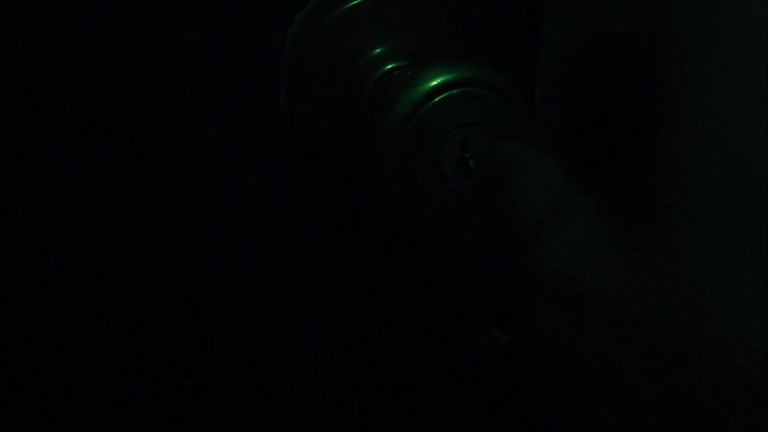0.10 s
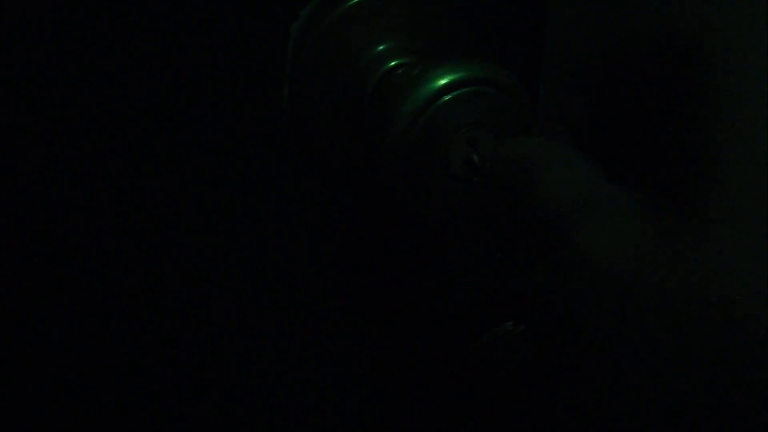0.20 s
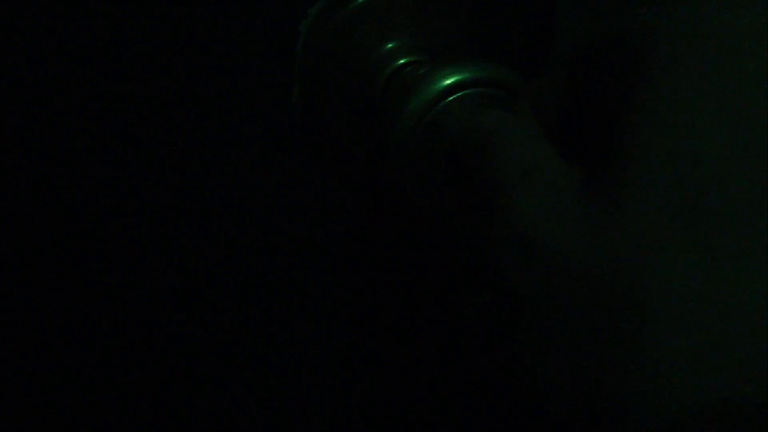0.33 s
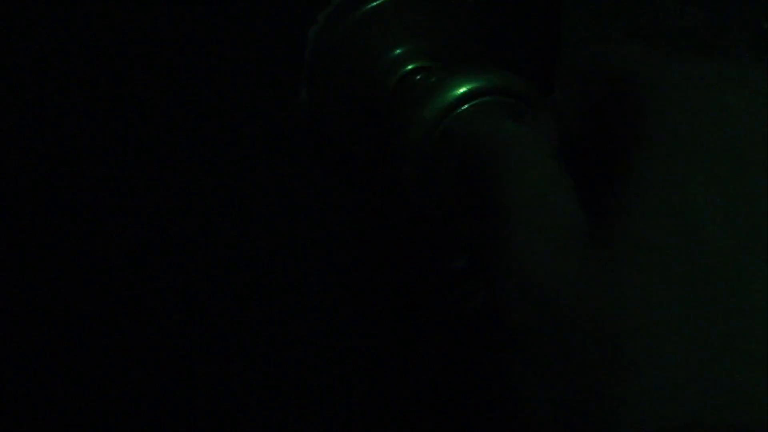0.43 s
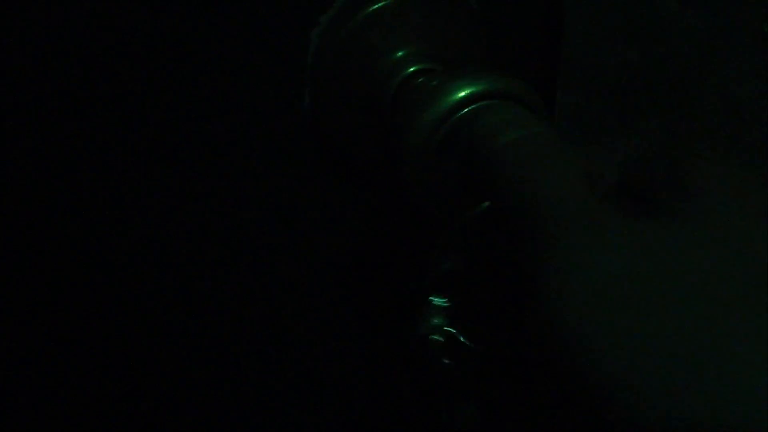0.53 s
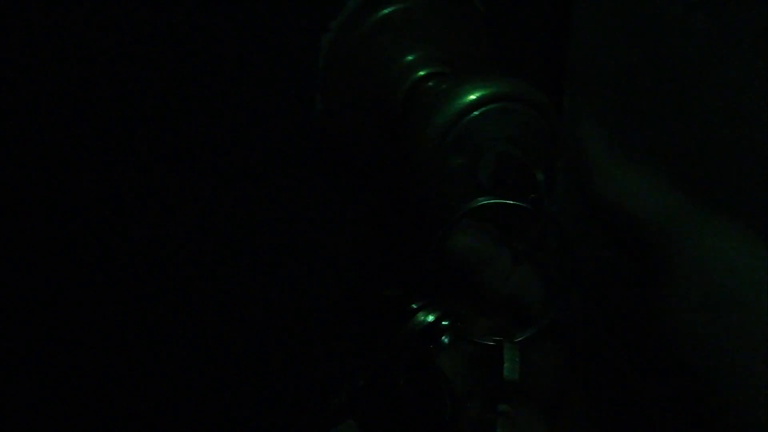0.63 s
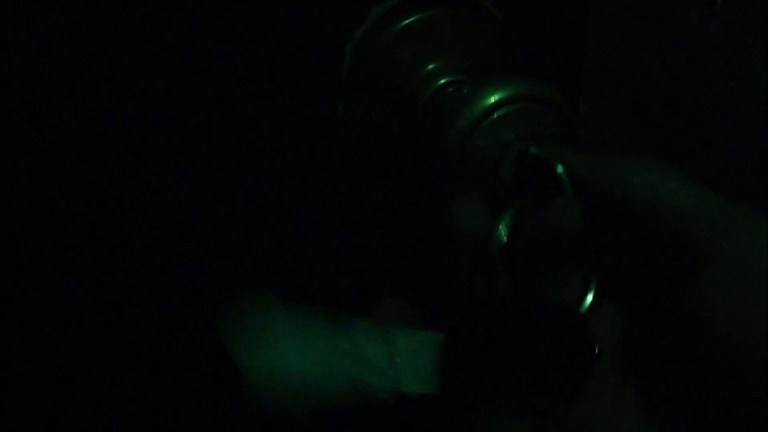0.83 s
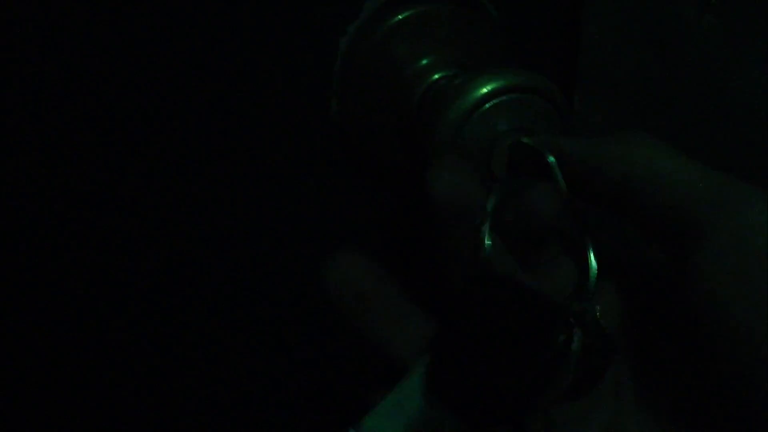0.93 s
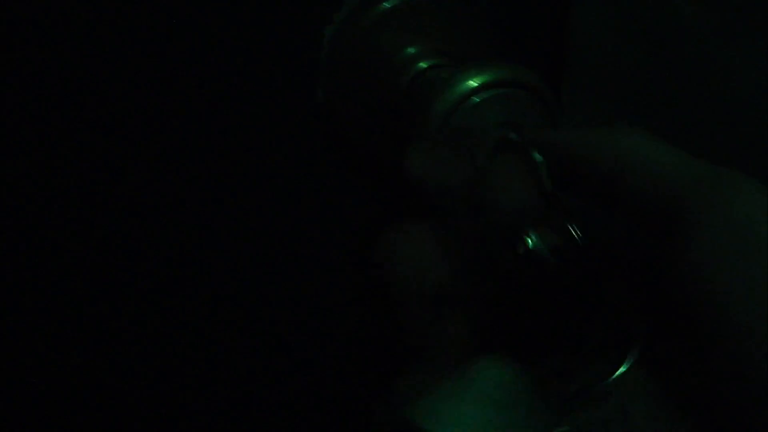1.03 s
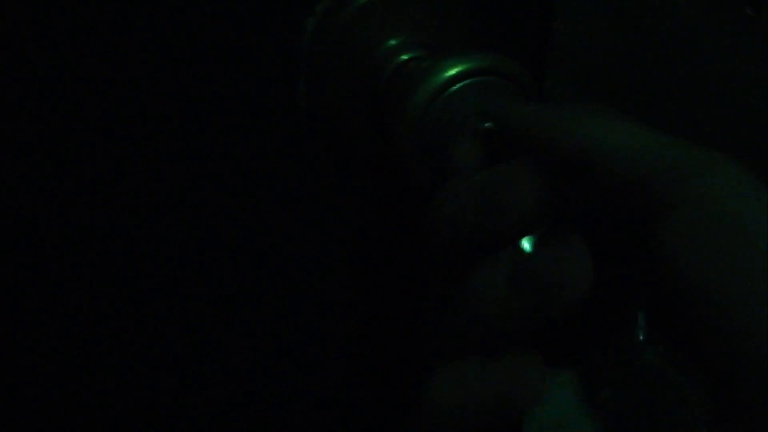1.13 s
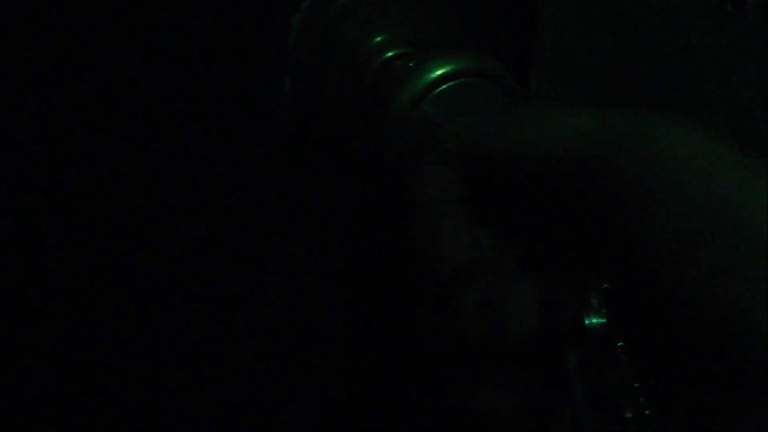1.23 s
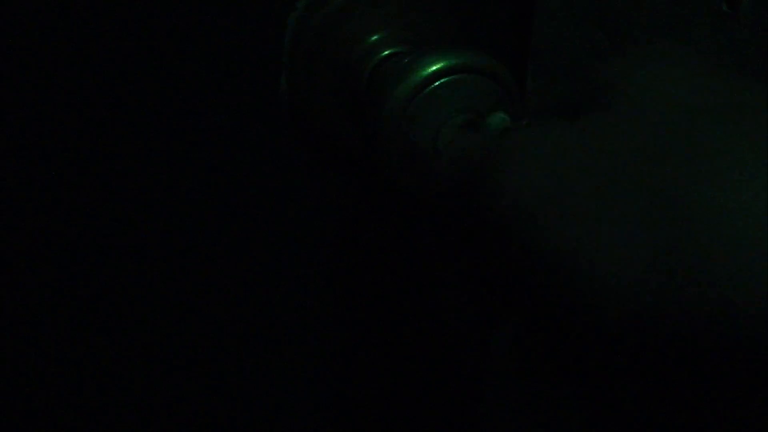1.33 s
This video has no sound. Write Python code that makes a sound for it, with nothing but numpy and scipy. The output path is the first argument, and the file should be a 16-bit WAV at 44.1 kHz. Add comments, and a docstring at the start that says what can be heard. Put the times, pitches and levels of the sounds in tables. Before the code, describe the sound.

Key worked in a door lock up close: grinding, hollow door knocks, then irregular metallic jangling

```python
"""On a porch at night a key is worked in a door lock, close to the microphone.
The lock grinds and scrapes as grains of friction and knocks in the booming door, built from damped modes.
The bunch swings, jangles and clicks as noise cracks and damped sines, and the hand takes hold of the key
again; a thin squeak is a wavering sine. Near walls answer briefly over a faint outdoor rush of noise."""
import sys
import numpy as np
from scipy import signal
from scipy.fft import rfft, irfft
from scipy.io import wavfile
from scipy.ndimage import uniform_filter1d

SR = 44100
rng = np.random.default_rng(int(sys.argv[2]) if len(sys.argv) > 2 else 0)


def dump(signal):
    """Clip the signal to [-1, 1] and save it as 16-bit WAV at the path in sys.argv[1]."""
    limited = np.clip(np.atleast_2d(signal).T, -1, 1)
    pcm = np.round(limited * 32767).astype(np.int16)
    wavfile.write(sys.argv[1], SR, pcm)


N = 61740
TIME = np.arange(N) / SR
HALF_SECOND = TIME[:SR // 2]
SIZE = 2 * 65536  # transform length, samples
HZ = np.fft.rfftfreq(SIZE, 1 / SR)

# Rubbing of key and lock. Each row: time in seconds, low grinding in relative dB, bright scraping in dB.
RUBBING = [(0, -49.5, -62), (.17, -47, -65), (.222, -38.5, -71), (.23, -21, -36), (.28, -26, -31),
           (.32, -27, -25), (.385, -32, -31), (.415, -50, -47), (.47, -43, -56), (.545, -37, -37.5),
           (.6, -41, -47.5), (.668, -41.5, -34), (.71, -49.5, -51.5), (.775, -39.5, -36.5),
           (.825, -44, -38), (.865, -44, -24.5), (.93, -38.5, -40.5), (.975, -44, -34.5), (1.0, -45, -48),
           (1.08, -49.5, -56), (1.1, -54, -38.5), (1.2, -39.5, -41.5), (1.27, -41.5, -46),
           (1.335, -38.5, -56), (1.36, -36, -48), (1.4, -38, -45)]


def amp(db):
    """Decibels to gain."""
    return 10 ** (np.asarray(db) / 20)


def unit(x):
    """Scale to rms 1."""
    return x / np.sqrt(np.mean(x ** 2) + 1e-20)


def along(points, hz):
    """Read (Hz, value) points on a log frequency axis."""
    point_hz, values = np.transpose(points)
    return np.interp(np.log(hz + 1), np.log(point_hz + 1), values)


def curves(rows):
    """Draw each column after the time as straight lines, one value per sample."""
    seconds, *columns = np.transpose(rows)
    return [np.interp(TIME, seconds, column) for column in columns]


def fade(t, t60):
    """Exponential decay, down 60 dB after t60 seconds."""
    return np.exp(-np.log(1000) * t / t60)


def filtered(x, response):
    """Filter x by a response on the frequency grid."""
    return irfft(rfft(x, SIZE) * response, SIZE)[..., :x.shape[-1]]


def spread(pair):
    """Turn two unrelated signals into left and right, alike in the bass and wider in the treble."""
    # Likeness of the two channels. Each row: frequency in Hz, correlation from 0 to 1.
    likeness = [(30, .5), (130, .99), (350, .97), (700, .82), (1500, .55), (5000, .5), (13000, .45)]
    turn = np.arccos(np.clip(along(likeness, HZ), 0, 1)) / 2
    mid, side = filtered(pair, np.array([np.cos(turn), np.sin(turn)]))
    return np.array([mid + side, mid - side])


def noise(colour):
    """Coloured stereo noise of rms 1."""
    white = spread(rng.standard_normal((2, N)))
    return unit(filtered(white, amp(along(colour, HZ))))


def pan(x, db):
    """Raise the left and lower the right by db."""
    return x * amp([[db], [-db]])


def add(out, s, sound):
    """Mix a sound in at s seconds."""
    part = out[:, max(round(s * SR), 0):][:, :sound.shape[-1]]
    part += sound[..., :part.shape[1]]


def bursts(hits, colour, t60):
    """Each (seconds, dB) contact gives a crack: coloured noise that rises fast and dies in t60 seconds."""
    out = np.zeros((2, N))
    stock = noise(colour)
    t = TIME[:SR // 20]
    shape = fade(t, t60) * (1 - fade(t, t60 / 10))
    starts = rng.integers(0, N - len(shape), len(hits))
    for (s, db), start in zip(hits, starts):
        crack = stock[:, start:start + len(shape)] * shape
        even_energy = np.linalg.norm(shape) * 2 / np.linalg.norm(crack)
        add(out, s, amp(db) * crack * even_energy)
    return out


def pulse(colour):
    """One causal push of the given colour, peak 1, made minimum-phase by folding its cepstrum."""
    cepstrum = irfft(np.log(amp(along(colour, HZ))))
    cepstrum[1:SIZE // 2] *= 2
    cepstrum[SIZE // 2 + 1:] = 0
    push = irfft(np.exp(rfft(cepstrum)))[:SR // 2]
    return push / np.abs(push).max()


def friction(colour, level_db):
    """Tiny slips of random size and timing, coloured, under the level of the stroke."""
    slips_per_s, size_spread_db = 2200, 2
    sizes = amp(size_spread_db * np.clip(rng.standard_normal(N), -2, 2))
    slips = (rng.random(N) < slips_per_s / SR) * sizes
    grains = spread(slips * rng.standard_normal((2, N)))
    return amp(level_db) * unit(filtered(grains, amp(along(colour, HZ))))


def night_air():
    """The faint outdoor rush: steady coloured noise."""
    # Spectrum of the night air. Each row: frequency in Hz, relative level in dB.
    night_colour = [(25, -35), (80, -15), (150, -9.5), (210, 2), (300, -3), (400, -3.5), (460, 3),
                    (620, -6), (1050, -5.5), (2000, -11), (5000, -21), (9000, -28.5), (10200, -28),
                    (13000, -57)]
    level_db = -49.5
    return amp(level_db) * noise(night_colour)


def porch(x):
    """A few near reflections and a short diffuse tail; little bass comes back in the open."""
    # Decay of the tail. Each row: frequency in Hz, t60 in seconds.
    decay = [(200, 0.57), (1500, 0.52), (5000, 0.09), (12000, 0.23)]
    # Near walls. Each row: nominal delay in seconds, reflection in dB before the bass is thinned.
    near_walls = [(.0032, -10.5), (.0062, -10), (.0098, -11.5)]
    tail_db, rise_s, low_hz = -8.5, 0.0013, 407
    hz, t, z = signal.stft(rng.standard_normal((2, SR // 2)), SR, nperseg=256)
    tail = signal.istft(z * fade(t, along(decay, hz)[:, None]), SR, nperseg=256)[1]
    tail = tail * (1 - np.exp(-TIME[:tail.shape[1]] / rise_s))
    response = amp(tail_db) * rfft(tail / np.linalg.norm(tail[0]), SIZE)
    for s, db in near_walls:
        delay = s * rng.uniform(.9, 1.1, (2, 1))  # differs a little between the channels
        response = response + amp(db) * np.exp(-2j * np.pi * HZ * delay)
    bass_loss = HZ ** 2 / (HZ ** 2 + low_hz ** 2)
    return filtered(x, response * bass_loss)


def squeak():
    """The key squeaks as it turns: a thin, unsteady, mostly falling note of metal on metal."""
    # Path of the squeak. Each row: time in seconds, pitch in Hz, sine peak in dB.
    squeak_path = [(1.255, 4450, -70), (1.272, 4390, -47), (1.295, 4410, -49), (1.308, 4310, -42),
                   (1.335, 4165, -53), (1.37, 4060, -52), (1.39, 4150, -80)]
    waver_hz = 61.4  # rms
    hz, db = curves(squeak_path)
    waver = unit(uniform_filter1d(rng.standard_normal(N), size=60))
    phase = 2 * np.pi * np.cumsum(hz + waver_hz * waver) / SR
    return amp(db) * np.sin(phase)


def door_panel():
    """The door panel's answer to a blow: a sum of damped sines."""
    # Panel modes. Each row: frequency in Hz, relative level in dB, t60 in seconds.
    panel_modes = [(192.9, 2.5, 0.23), (214.3, 2.5, .38), (234, -11.5, 0.3), (295, 1, 0.17),
                   (357.2, -6, 0.24), (386.8, 1.5, 0.22), (474, 0, .28), (547, -8, 0.22), (721, -16, 0.45),
                   (764, -8, 0.23), (820, -25, 0.2), (895, -4, 0.15), (1130, -0.5, 0.065),
                   (1476, -19, 0.36)]
    t = HALF_SECOND
    return sum(amp(db) * fade(t, t60) * np.sin(2 * np.pi * hz * t) for hz, db, t60 in panel_modes)


def grinding(panel):
    """Low friction in the lock, which also drives the modes of the door panel."""
    # Spectrum of the grinding. Each row: frequency in Hz, relative level in dB.
    grind_colour = [(25, -43), (90, -35), (140, -3.5), (200, -3.5), (450, 0), (1100, 0), (2300, -7.5),
                    (4500, -20.5), (12000, -37)]
    panel_db = -5.5  # panel against direct grinding
    grind = friction(grind_colour, curves(RUBBING)[0])
    boom = unit(filtered(grind.mean(axis=0), rfft(panel, SIZE))) * np.std(grind)
    return grind + amp(panel_db) * boom


def knocks():
    """The lock knocks in the door: each blow is a hollow rap of noise and a dull thud of one push."""
    # Knocks. Each row: start in seconds, relative rap level in dB, thud against rap in relative dB.
    knock_times = [(.187, -31.5, -13), (0.209, -36, 3), (0.2273, -19.5, 6), (0.2424, -18, -5.5),
                   (0.2466, -22.5, 2), (0.2538, -21.5, 4), (0.265, -20.5, -9), (0.2764, -21.5, 0),
                   (.295, -16, 7.5), (.3065, -16, 8.5), (0.319, -19.5, 5.5), (0.3275, -25, 6),
                   (.335, -25, -2), (0.356, -29, 22), (.555, -37, -1), (.668, -28, -4), (0.86, -33, -10),
                   (.9393, -32, -19), (0.9648, -31.5, -3), (1.058, -27.5, -23), (1.066, -37.5, -12),
                   (1.0755, -32.5, -14), (1.191, -31, -15), (1.287, -29.5, -11), (1.344, -28.5, 2),
                   (1.356, -33.5, -11), (1.367, -34, -2)]
    # Spectrum of the rap. Each row: frequency in Hz, relative level in dB.
    rap_colour = [(60, -47), (280, -14), (470, 3.5), (780, 5.5), (1200, -1.5), (2300, -5), (5000, -56),
                  (12000, -60)]
    # Spectrum of the thud. Each row: frequency in Hz, relative level in dB.
    thud_colour = [(30, -48), (100, -19.5), (150, -8), (200, 1), (300, 1.5), (500, -7.5), (1000, -22.5),
                   (4000, -37.5)]
    rap_t60, thud_gain_db = 0.034, 1.5  # seconds, dB on every thud
    out = bursts([(s, db) for s, db, _ in knock_times], rap_colour, rap_t60)
    thud = amp(thud_gain_db) * pulse(thud_colour)
    for s, db, thud_db in knock_times:
        add(out, s, amp(db + thud_db) * thud)
    return out


def booms(panel):
    """Heavy knocks set the whole door booming: the panel modes with a soft rise."""
    # Booms of the door. Each row: start in seconds, relative level in dB.
    boom_times = [(0.2274, -29), (0.3064, -22.5), (.555, -44.5), (1.125, -53.5), (1.344, -40.5)]
    rise_s = 0.024  # seconds to 99.9 % of full strength
    out = np.zeros((2, N))
    for s, db in boom_times:
        add(out, s, amp(db) * panel * (1 - fade(HALF_SECOND, rise_s)))
    return out


def scraping():
    """Bright friction of the key against the metal of the lock."""
    # Spectrum of the scraping. Each row: frequency in Hz, relative level in dB.
    scrape_colour = [(300, -31), (1500, -10.5), (2500, -4.5), (4200, 1), (5500, -2), (7500, 1), (9000, 0),
                     (10100, 4.5), (11700, 0), (13000, -8)]
    return friction(scrape_colour, curves(RUBBING)[1])


def lock():
    """The key scrapes; grinding and knocks pass into the door, and heavy knocks set it booming."""
    low_hz, struck_db, pan_db = 133, -3.5, 1  # high-pass, gain of grinding and knocks, left up
    panel = door_panel()
    struck = grinding(panel) + knocks()
    bass_cut = signal.butter(3, low_hz, "highpass", fs=SR, output="sos")
    door = amp(struck_db) * signal.sosfilt(bass_cut, struck) + booms(panel)
    return pan(door, pan_db) + scraping()


def ring(modes):
    """Damped sines, with new strengths and phases for each blow and each channel."""
    scatter_db = 0.5
    t = HALF_SECOND
    out = np.zeros((2, len(t)))
    for hz, db, t60 in modes:
        strength = amp(db + scatter_db * rng.standard_normal((2, 1)))
        phase = rng.uniform(-np.pi / 2, np.pi / 2, (2, 1))
        out += strength * fade(t, t60) * np.sin(2 * np.pi * hz * t + phase)
    return out


def ringing_pieces():
    """Blows leave one piece ringing freely until a neighbour touches it and damps it fast."""
    # Modes under the name of each piece. Each row: frequency in Hz, relative level in dB, t60 in seconds.
    pieces = {"long key": [(2123, -13, 0.28), (6160, 1.5, 0.069), (6930, 2, 0.12), (9986, -14, .1),
              (11350, 3, 0.34)], "short key": [(6880, 5.5, 0.053), (7820, -3, 0.168), (9240, -7, 0.2),
              (11670, -8, 0.24)], "small key": [(10050, -3, 0.134), (11680, -2.5, 0.27)],
              "flat key": [(10030, -2.5, 0.11), (10170, -5, 0.053), (10780, 1.5, 0.021)],
              "key in lock": [(3200, -24, 0.034), (3980, -11, .02), (4110, 1.5, 0.028), (4190, 1.5, 0.029),
              (4370, -6, 0.018), (7000, -20, .06)]}
    # Blows. Each row: start in seconds, relative level in dB, free ringing in seconds, name of the piece.
    blows = [(0.0603, -31.5, 0.0022, "flat key"), (0.2279, -24.5, 0.034, "flat key"),
             (0.322, -19, .05, "flat key"), (0.357, -32, 0.045, "short key"),
             (.507, -39, 0.0069, "small key"), (0.5533, -28.5, 0.011, "flat key"),
             (0.668, -39, 0.023, "small key"), (0.683, -36, 0.018, "small key"),
             (.726, -34.5, 0.013, "small key"), (.771, -42, 0.011, "flat key"),
             (.803, -43, .008, "small key"), (0.8303, -27, 0.034, "long key"),
             (0.8642, -25, .016, "short key"), (0.9, -32.5, 0.013, "short key"),
             (0.939, -39, .01, "short key"), (0.9563, -26, 0.0089, "short key"),
             (0.966, -16, 0.0065, "key in lock"), (1.0405, -36, .008, "key in lock"),
             (1.1461, -28.5, 0.0054, "short key"), (1.1444, -26, .008, "key in lock")]
    stopped_t60 = 0.013  # seconds
    out = np.zeros((2, N))
    for s, db, free_s, piece in blows:
        stopping = fade(np.maximum(HALF_SECOND - free_s, 0), stopped_t60)
        add(out, s, amp(db) * ring(pieces[piece]) * stopping)
    return out


def contacts():
    """Metal touches metal: a middling clack and a bright tick of damped noise at each contact."""
    # Contacts of keys and lock. Each row: start in seconds, relative clack in dB, relative tick in dB.
    clicks = [(.0605, -45.5, -39), (0.1797, -39.5, -43.5), (0.1863, -36, -62), (0.2071, -41, -43),
              (0.2287, -24, -28.5), (0.2423, -14, -30), (0.255, -39, -20.5), (.2595, -39, -26),
              (.276, -31, -27), (0.3024, -26, -14.5), (0.3082, -21, -30.5), (0.325, -27, -23),
              (.329, -37, -20.5), (.355, -19, -15), (.372, -37, -27), (0.3853, -44, -23),
              (.507, -32.5, -32.5), (0.52, -39, -30), (0.5532, -32.5, -31), (.562, -37, -37),
              (.641, -42, -36), (.603, -39, -34.5), (0.6678, -33, -38), (0.6813, -29, -19.5),
              (0.7445, -34, -29), (0.771, -31, -25.5), (0.7896, -34, -47), (0.8296, -27.5, -18.5),
              (0.8539, -25.5, -17), (0.8648, -26, -23), (0.8674, -32, -22), (.875, -31, -19),
              (0.8778, -42, -17.5), (0.8839, -31, -23), (0.897, -40, -21), (.901, -23.5, -13),
              (0.912, -28, -21.5), (0.9145, -31, -21), (0.9381, -27, -13.5), (0.9392, -15.5, -20),
              (0.9548, -25, -20), (.9655, -23, -18.5), (0.969, -23, -21), (0.977, -43, -21),
              (1.0407, -23.5, -32), (1.0445, -28.5, -27.5), (1.0933, -38, -31.5), (1.0958, -25, -28),
              (1.1237, -25, -22.5), (1.1305, -26.5, -29), (1.1451, -21, -18.5), (1.178, -30.5, -34),
              (1.1908, -23.5, -26), (1.201, -31, -41), (1.222, -33.5, -30.5), (1.2598, -37.5, -31),
              (1.288, -44, -36), (1.3438, -26.5, -35), (1.348, -41, -46), (1.3566, -23, -49),
              (1.362, -29.5, -47), (1.37, -32, -46)]
    # Spectrum of the clack. Each row: frequency in Hz, relative level in dB.
    clack_colour = [(200, -42), (700, -9.5), (1600, -1), (2400, 2), (3300, 4), (4300, 2.5), (5500, -14),
                    (8000, -9), (14000, -42)]
    # Spectrum of the tick. Each row: frequency in Hz, relative level in dB.
    tick_colour = [(1500, -43), (4000, -2.5), (5500, -3.5), (7200, -1.5), (8600, -3), (10000, 5.5),
                   (11700, 1.5), (13000, -8.5)]
    clack_t60, tick_t60 = 0.011, 0.014  # seconds
    clack_pan_db, tick_pan_db = -1.1, -0.95  # right up
    clacks = bursts([(s, db) for s, db, _ in clicks], clack_colour, clack_t60)
    ticks = bursts([(s, db) for s, _, db in clicks], tick_colour, tick_t60)
    return pan(clacks, clack_pan_db) + pan(ticks, tick_pan_db)


def keys():
    """The bunch clicks at each contact, and some blows leave a piece ringing."""
    return ringing_pieces() + contacts()


def scene():
    """Keys and lock close by, reaching the right channel first, with the porch's answer over night air."""
    right_lead_s = 2.4e-5
    near = squeak() + lock() + keys()
    shift = np.exp(1j * np.pi * HZ * right_lead_s * np.array([[-1], [1]]))
    near = filtered(near, shift)
    return night_air() + porch(near) + near


def record(dry):
    """The recorder's band ends very steeply at its upper limit."""
    top_hz = 12850
    return filtered(dry, 1 / np.sqrt(1 + (HZ / top_hz) ** 100))


dry = scene()
out = record(dry)
dump(out)
```